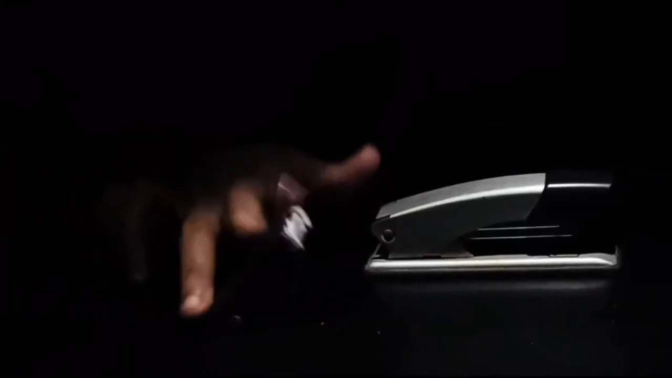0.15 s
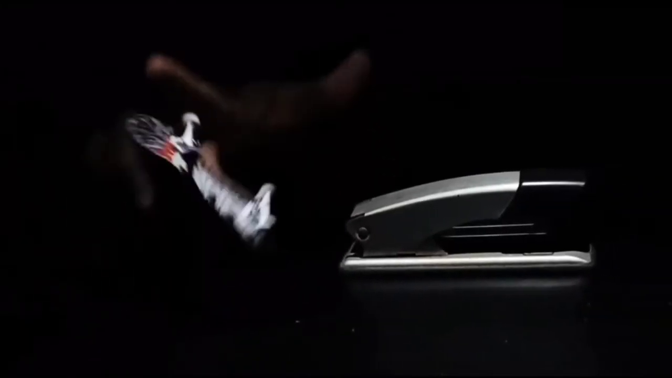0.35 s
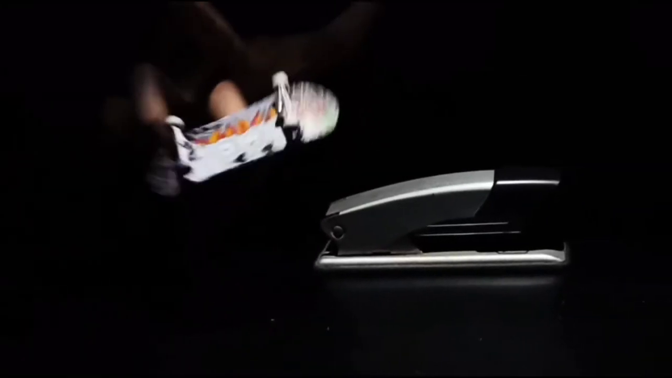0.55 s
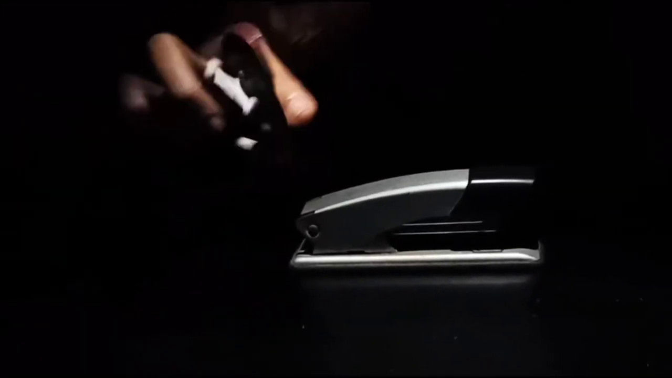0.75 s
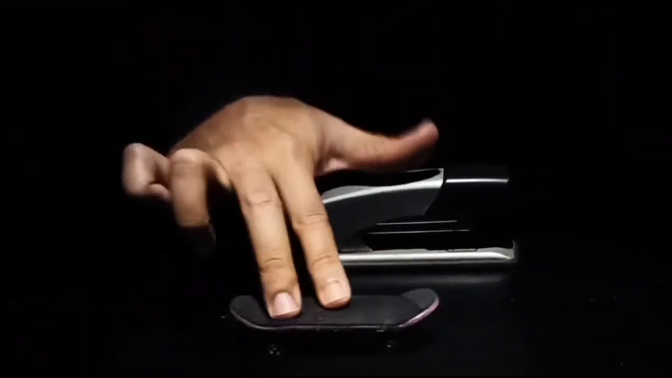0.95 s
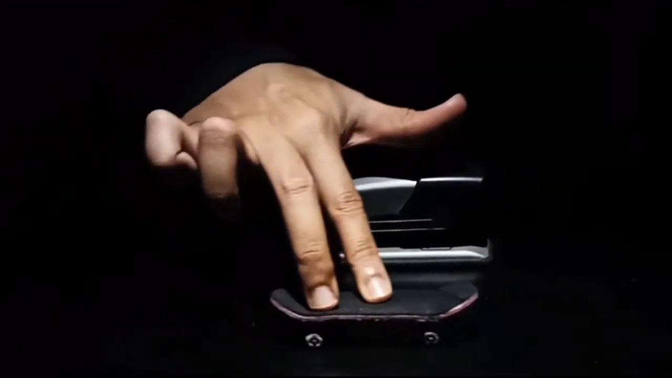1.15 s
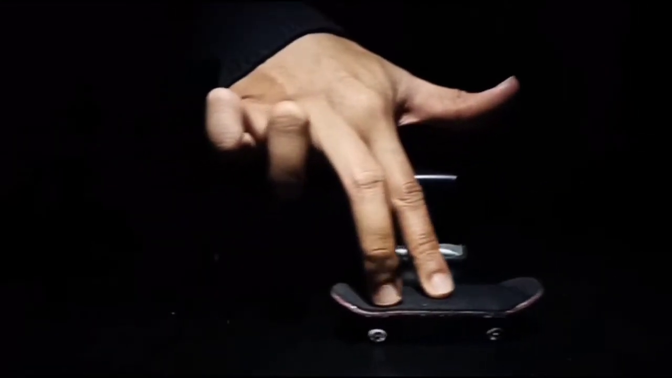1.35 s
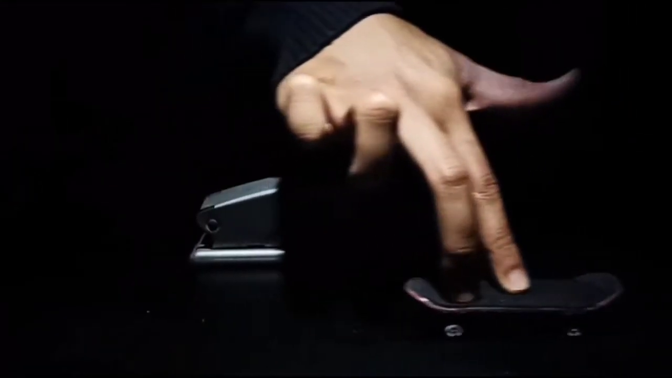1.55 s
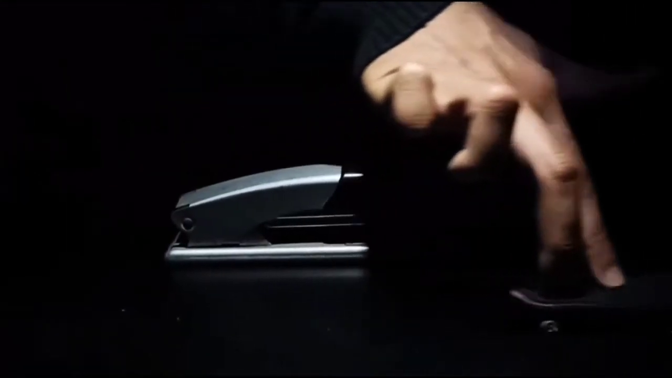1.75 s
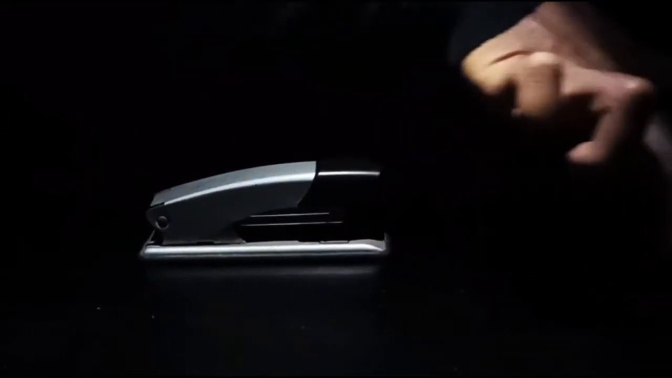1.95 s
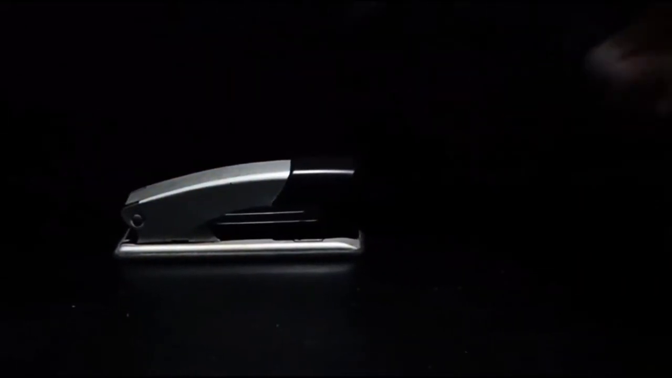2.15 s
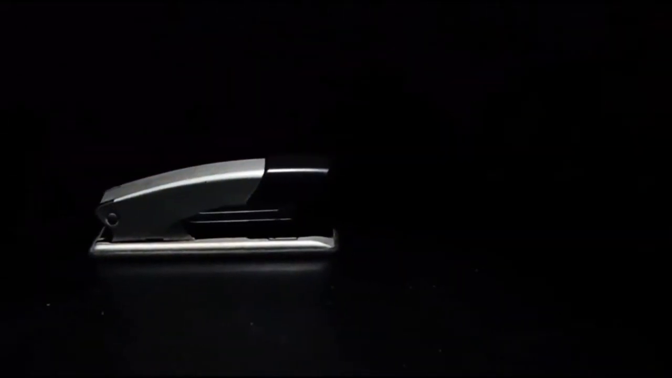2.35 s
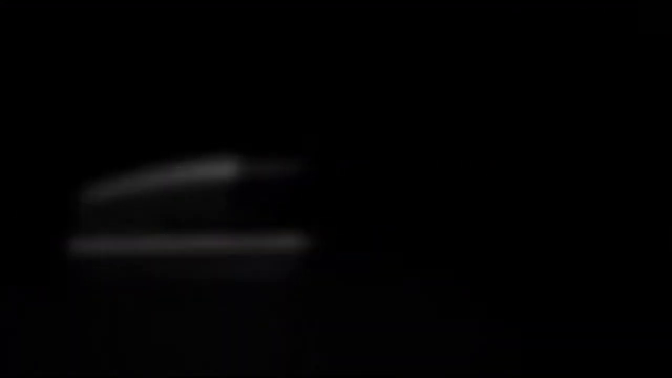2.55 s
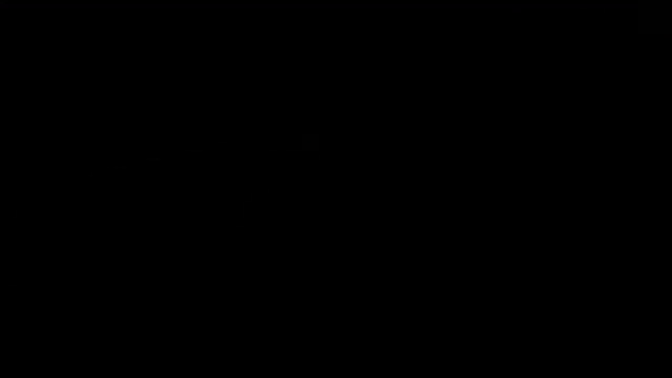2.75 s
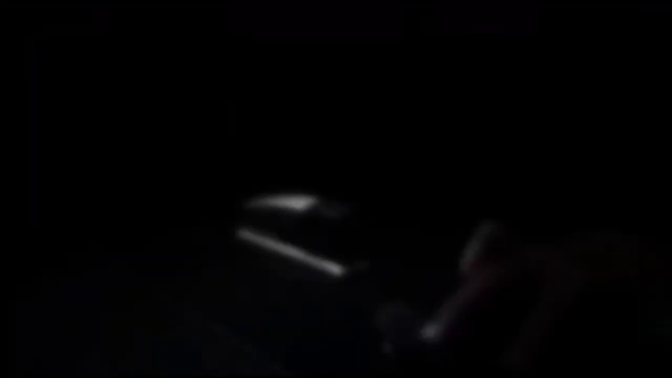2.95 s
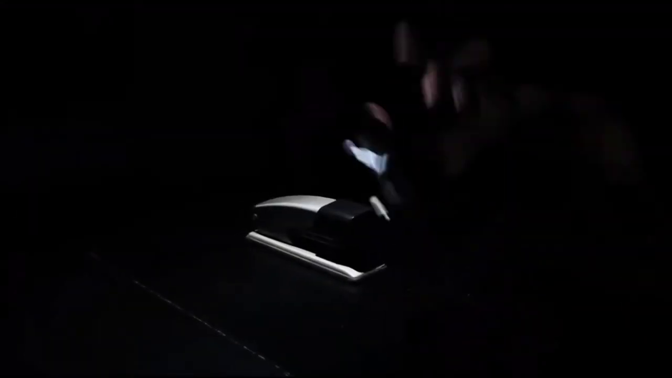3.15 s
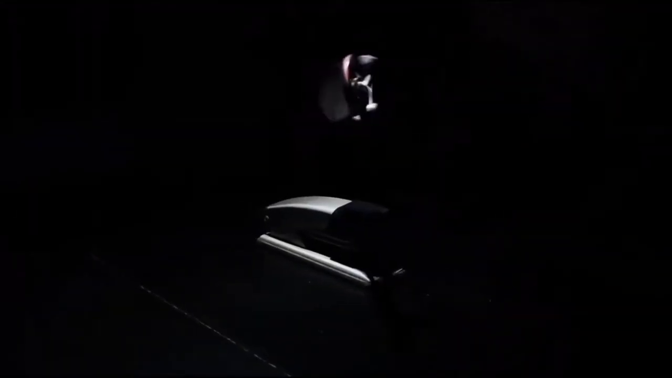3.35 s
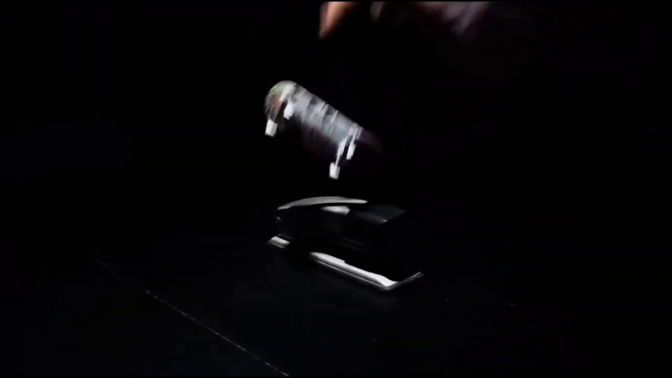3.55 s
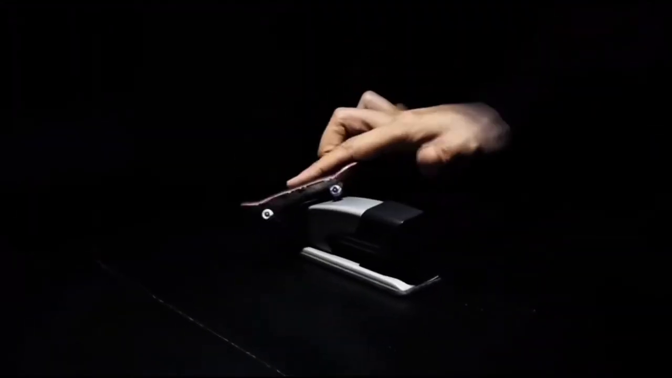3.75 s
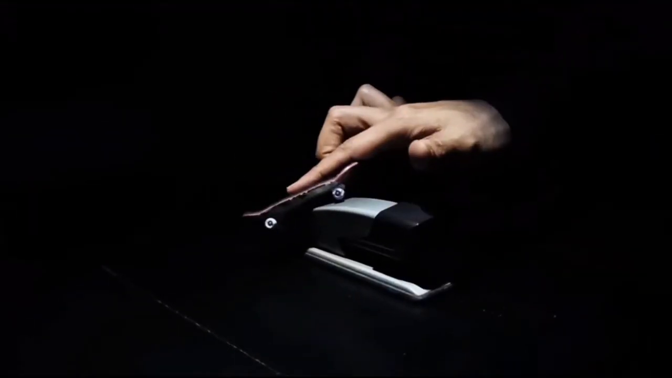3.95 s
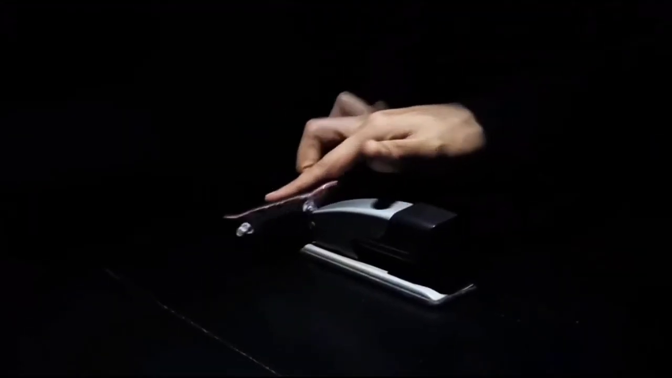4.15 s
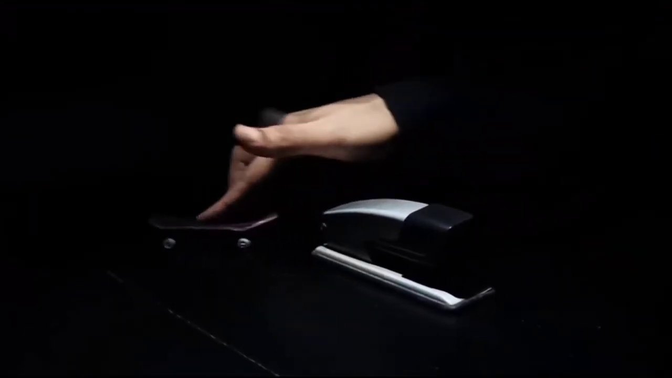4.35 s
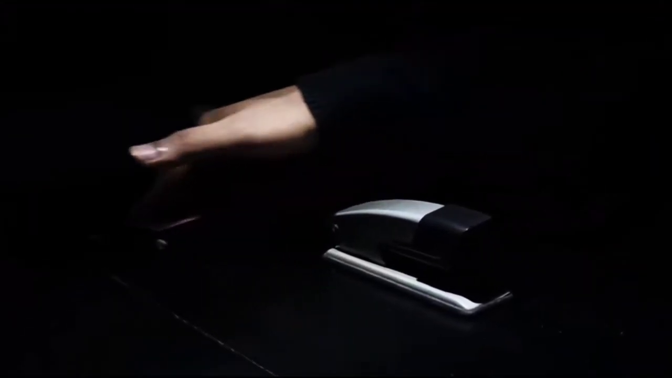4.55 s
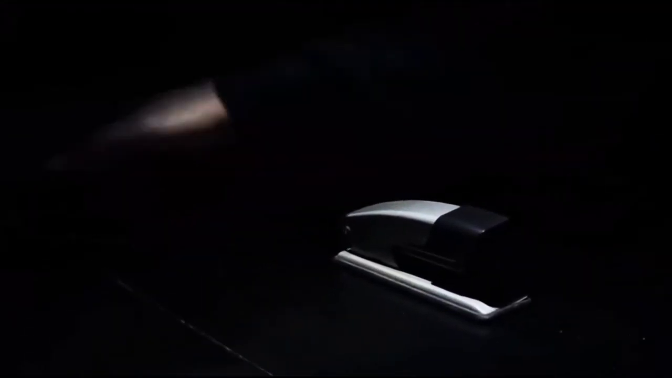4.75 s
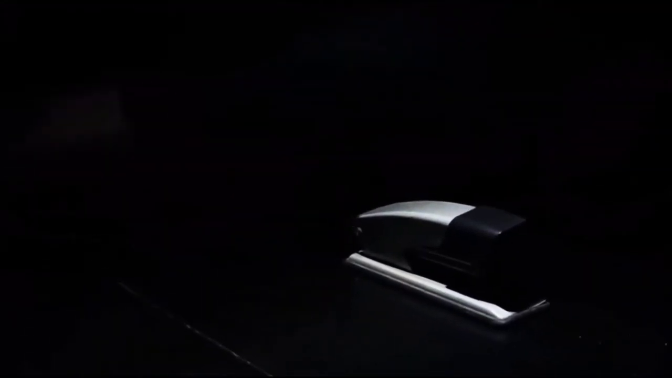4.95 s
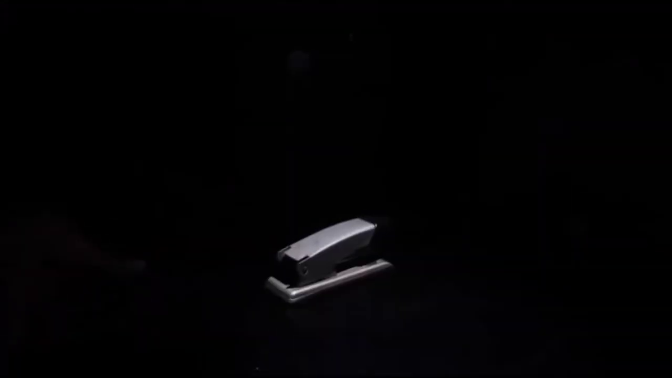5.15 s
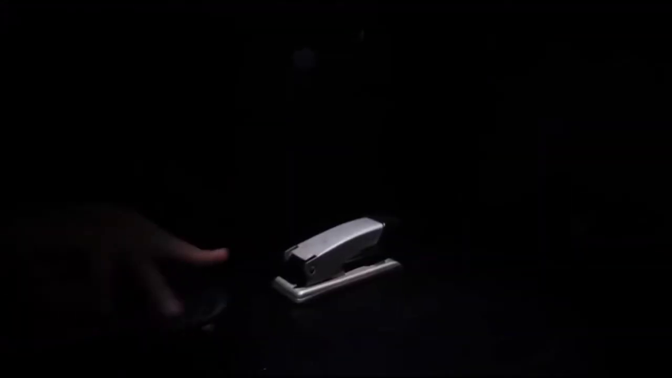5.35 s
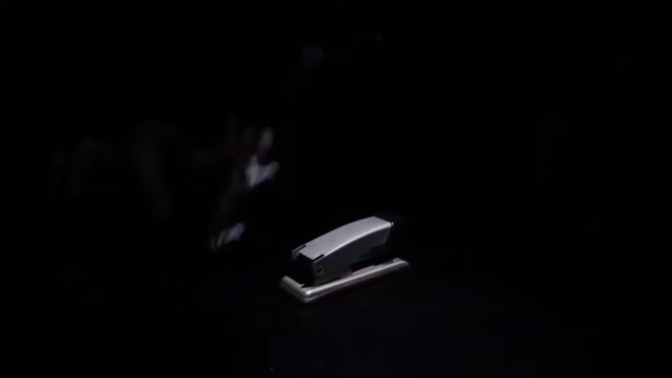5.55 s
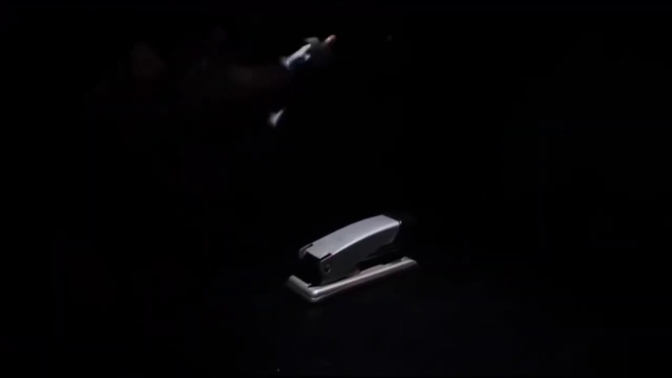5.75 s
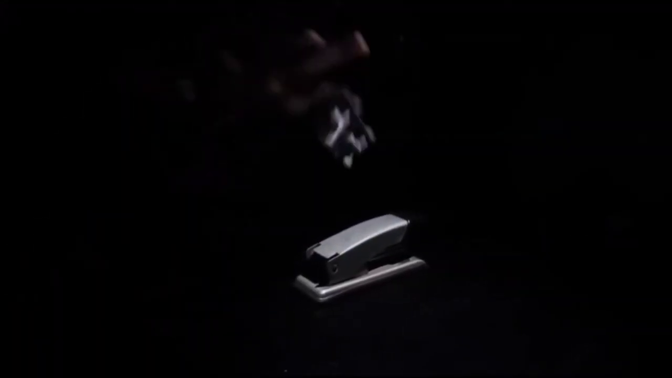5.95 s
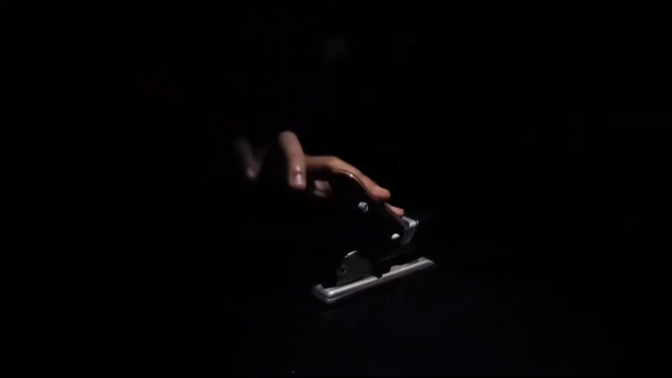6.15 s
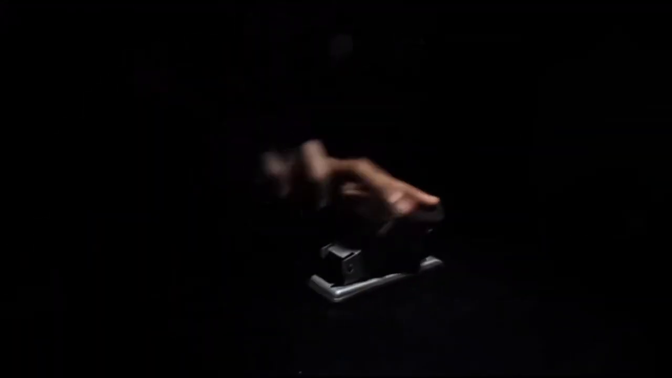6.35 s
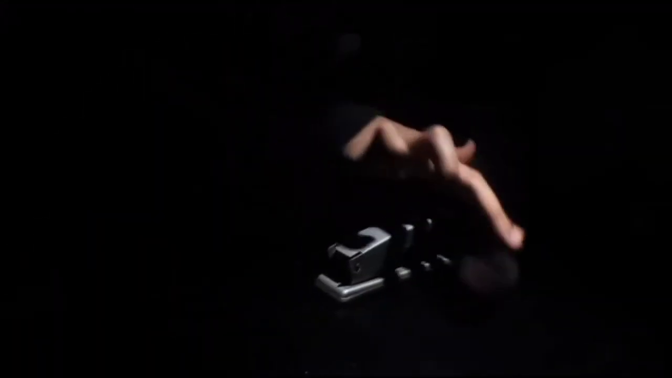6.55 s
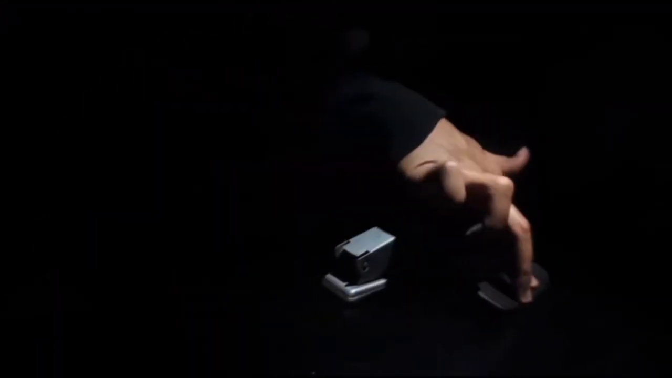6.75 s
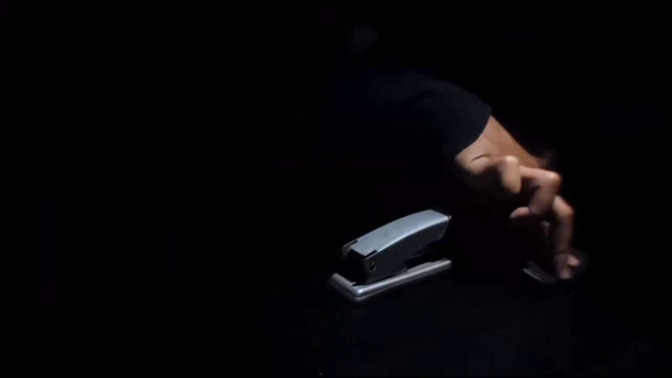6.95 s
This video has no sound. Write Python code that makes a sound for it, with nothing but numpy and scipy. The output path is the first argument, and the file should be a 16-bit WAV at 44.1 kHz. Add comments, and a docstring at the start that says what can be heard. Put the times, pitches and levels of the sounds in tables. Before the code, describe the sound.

Small wheels roll grittily and speed up before a dry tail crack; near silence, then a heavy double clack and fading roll. Again a roll and pop, a gap, a bright steel clack with rough metallic swell, gritty scrapes and table clacks. Finally hoarse wheel skids, a pop, another steel hit, a brief ping and a landing. Close, dry, slightly reverberant indoor stereo sound with faint air.

```python
"""Small hard wheels rumble over a table top, then a tail snaps down with a dry crack: a fingerboard does three
tricks, over a steel stapler too, in a small hard room. Rolling, skids, drags and rough metallic swells are
noise through resonances; pops, landings and taps are bursts of clicks that ring the struck body.
The level drops at the start and four more times, three of them between a pop and its landing.
A limiter holds down the loudest clacks."""
import sys
import numpy as np
from scipy import signal
from scipy.fft import rfft, irfft, next_fast_len
from scipy.io import wavfile
from scipy.ndimage import uniform_filter1d, minimum_filter1d, map_coordinates

SR = 44100
rng = np.random.default_rng(int(sys.argv[2]) if len(sys.argv) > 2 else 0)


def master_out(mix):
    """Clip the mix to full scale and print it as 16-bit PCM to the path in sys.argv[1]."""
    frames = np.transpose(np.atleast_2d(mix))
    ceiling = np.clip(frames, -1, 1)
    pcm = np.round(ceiling * 32767).astype(np.int16)
    wavfile.write(sys.argv[1], SR, pcm)


N = 308744
TIME = np.arange(N) / SR
ONSET_S = 0.008  # a clack has this much room for its soft onset ahead of its peak
THUMP_LEAD_S = 0.008  # the fingers' weight reaches the table just before the wheels clack

# Well damped resonances of deck, trucks and wheels.
# Each row: frequency in Hz, width in Hz, level in dB.
BOARD_MODES = [(1996, 870, -4.5), (3110, 220, 5.5), (3660, 330, 7.5), (4280, 460, 7), (6255, 310, 1.5),
               (7360, 300, -1.5), (8340, 150, -11)]
# Resonances of the stapler's steel cover.
# Each row: frequency in Hz, width in Hz, level in dB.
STAPLER_MODES = [(1650, 520, -1), (3880, 120, 3.5), (4160, 220, 9), (4523, 200, 7.5), (5750, 200, 0.5),
                 (6210, 530, 0.5), (6860, 86, 4), (7360, 190, -2.5), (7900, 130, -3)]
RINGS_WITH = {"table": BOARD_MODES, "stapler": STAPLER_MODES}
# Spectrum of grit under the wheels. Each row: frequency in Hz, level in dB.
GRIT_SPECTRUM = [(300, -39), (1200, -1), (2300, 0), (3300, 1.5), (4500, 1.5), (5500, -5.5), (6400, -0.5),
                 (8500, -11), (12500, -16.5), (16000, -15)]
# The tail snapping on the table; the note depends on where the fingers hold the deck.
# Each row: time in seconds, strength in dB, deck note in Hz, note level in dB, note t60 in seconds.
POP_ROWS = [(0.4417, 1, 272, -24, 0.12), (3.3844, -1.5, 475, -30, 0.29), (5.864, -0.5, 402, -32, 0.16)]


def amp(db):
    """Decibels to gain."""
    return 10 ** (np.asarray(db) / 20)


def unit(x):
    """Scale to rms 1."""
    return x / np.sqrt(np.mean(x ** 2) + 1e-20)


def along(points, hz):
    """(Hz, value) points read on a log frequency axis."""
    f, v = np.transpose(points)
    return np.interp(np.log(hz + 1), np.log(f + 1), v)


def filtered(x, response):
    """x times a response of frequency."""
    size = x.shape[-1]
    m = next_fast_len(size + 8192)
    return irfft(rfft(x, m) * response(np.fft.rfftfreq(m, 1 / SR)), m)[..., :size]


def coloured(x, spectrum):
    """x shaped by (Hz, dB) points."""
    return filtered(x, lambda hz: amp(along(spectrum, hz)))


def resonant(x, modes, direct_db):
    """x through (Hz, width, dB) resonances, over a direct path."""
    def response(f):
        peaks = sum(amp(db) * 1j * f * w / (c * c - f * f + 1j * f * w) for c, w, db in modes)
        return amp(direct_db) + peaks
    return filtered(x, response)


def wobble(rate):
    """A smooth random curve, rate knots a second."""
    return map_coordinates(rng.standard_normal(8192), [TIME * rate], mode="wrap")


def panned(lr_db):
    """Left and right gains of equal total power; positive leans left."""
    g = amp(np.array([np.atleast_1d(lr_db), -np.atleast_1d(lr_db)]) / 2)
    return g / np.sqrt(np.mean(g ** 2, axis=0))


def add(track, s, sound):
    """Mix a sound into a track at time s."""
    part = track[:, round(s * SR):][:, :sound.shape[-1]]
    part += sound[..., :part.shape[-1]]


def arrival(x):
    """Direct sound reaches the left port a little later than the right, which is nearer the board."""
    port_lag = 0.0003307  # s
    return filtered(x, lambda hz: np.exp(-1j * np.pi * hz * port_lag * np.array([[1], [-1]])))


def room(x, build=0.0077):
    """Reflections thicken over the first moments, then each frequency dies at its own speed."""
    # How long the room rings. Each row: frequency in Hz, t60 in seconds.
    room_t60 = [(100, 0.72), (500, .5), (2000, 0.186), (5000, 0.45), (9000, 0.2963), (15000, 0.39)]
    # How bright its reflections are. Each row: frequency in Hz, level in dB.
    room_colour = [(100, 0.5), (400, -5.5), (1000, 1), (2500, 6), (4100, 2.5), (5400, -2.5), (7000, 3),
                   (9000, 2), (13000, -2)]
    hz, t, z = signal.stft(rng.standard_normal((2, SR // 2)), SR, nperseg=256)
    fade = amp(along(room_colour, hz)[:, None] - 60 * t / along(room_t60, hz)[:, None])
    tail = signal.istft(z * fade * (1 - np.exp(-t / build)), SR, nperseg=256)[1]
    return signal.fftconvolve(x, tail / np.linalg.norm(tail[0]), axes=1)


def asperities(rate, spread_db):
    """Stereo train of tiny impacts of uneven size, alike at both ports mainly in the bass."""
    # Each row: frequency in Hz, left-right likeness (1 = identical).
    likeness = [(100, 1), (300, 0.27), (900, 0.36), (2000, 0.049), (8000, 0.28)]

    def mid_side(hz):
        turn = np.arccos(np.clip(along(likeness, hz), -1, 1)) / 2
        return np.array([np.cos(turn), np.sin(turn)])
    size = amp(spread_db * wobble(rate))
    mid, side = filtered(size * rng.standard_normal((2, N)), mid_side)
    return np.array([mid + side, mid - side])


def gritty(size, rate, spread_db):
    """A short stereo burst of tiny impacts of uneven size, partly shared by both ports."""
    knots = rng.standard_normal(8192)
    sizes = amp(spread_db * np.interp(np.arange(size) * rate / SR, np.arange(len(knots)), knots))
    noise = rng.standard_normal((3, size))
    return unit(arrival(sizes * (noise[:2] + amp(-7.5) * noise[2])))


def ring(modes, t, scatter_db, detune, phase_spread):
    """Damped modes at new strengths for each blow, reaching each port at its own phase."""
    hz, db, t60 = np.transpose(modes)[:, :, None]
    level, pitch, phase = rng.standard_normal((3, len(modes), 1))
    size = amp(db + scatter_db * level)
    fade = size / np.linalg.norm(size) * amp(-60 * t / t60)
    angle = 2 * np.pi * hz * (1 + detune * pitch) * t
    ports = [np.sum(fade * np.sin(angle + side * phase_spread * phase), axis=0) for side in (1, -1)]
    return np.array(ports)


def swells(rows, rise_db_per_s, fade_db_per_s):
    """Gain that starts, climbs to its peak, fades steadily in dB and stops after its length."""
    total = 0
    for start, rise, length, db in rows:
        t = TIME - start
        sounding = uniform_filter1d(1.0 * ((t >= 0) & (t <= length)), size=180)
        drop_db = np.maximum(rise_db_per_s * (rise - t), fade_db_per_s * (t - rise))
        total = total + sounding * amp(db - drop_db)
    return total


def gliding(x, octaves_per_s):
    """Every resonance in x slides in pitch as the contact point moves."""
    index = np.arange(x.shape[1])
    position = np.cumsum(2 ** (octaves_per_s * index / SR))
    return np.array([np.interp(position, index, channel, right=0) for channel in x])


def gate(length, attack, release):
    """One second of gain that rises, holds and has fallen again after length."""
    t = np.arange(SR) / SR
    return np.clip(np.minimum(t / attack, (length - t) / release), 0, 1)


def air():
    """The faint air of the room is steady coloured noise."""
    # Each row: frequency in Hz, level in dB.
    air_spectrum = [(30, -29.5), (143, -6.5), (1000, -20.5), (6360, -23), (11000, -31), (12200, -29.5),
                    (15000, -26)]
    return amp(-51.0) * unit(coloured(rng.standard_normal((2, N)), air_spectrum))


def strokes():
    """Rumble gain, grit gain and pitch: each stroke gets going, speeds up or coasts, and dies away."""
    # Strokes of the wheels over the table. Each row: start, rise, hold and release in seconds,
    # rumble in dB, change over the hold in dB, grit over rumble in dB, top pitch in Hz.
    stroke_rows = [(0.155, 0.003, 0.2, 0.1, -26, 6, -7, 1024), (1.18, 0.22, 0.64, 0.42, -33, -6.5, -3, 960),
                   (2.042, 0.03, 0.023, 0.19, -39, 1, -18, 880),
                   (2.598, 0.06, 0.16, 0.047, -31.5, -3.5, -6, 870),
                   (2.91, 0.1, 0.27, 0.066, -25.5, 8, -5.5, 1110),
                   (4.308, 0.12, 0.011, 0.027, -29, 3, 4, 910),
                   (4.512, 0.023, 0.017, 0.13, -37.5, 6, 4, 830),
                   (4.547, 0.3, 0.31, 0.094, -25.5, -15, -8, 1110),
                   (5.303, 0.056, 0.076, 0.059, -26, 1.5, -6, 1030),
                   (5.539, 0.098, 0.15, 0.041, -27, 8.5, -8, 1270),
                   (6.78, 0.052, 0.13, 0.081, -32, -1.5, -5.5, 1110)]
    depth_db = 21  # what a stroke gains in its rise and loses over one release time
    sag_hz_per_db = 18.5  # the drumming sinks as the wheels slow down
    rumble, grit, pitch = [], [], []
    for start, rise, hold, release, db, change_db, grit_db, top_hz in stroke_rows:
        t = TIME - start
        edges = np.maximum(1 - t / rise, 0) + np.maximum(t - rise - hold, 0) / release
        effort_db = change_db * np.clip((t - rise) / hold, 0, 1) - depth_db * edges
        rumble.append(amp(db + effort_db))
        grit.append(amp(db + effort_db + grit_db))
        pitch.append(top_hz + sag_hz_per_db * (effort_db - max(change_db, 0)))
    # extra grit as the fingers load the tail before a pop
    press_db, press_lead_s, press_width_s = 9, 0.083, 0.064
    press = sum(np.exp(-((TIME - s + press_lead_s) / press_width_s) ** 2) for s, *_ in POP_ROWS)
    grit_gain = np.linalg.norm(grit, axis=0) * amp(press_db * press)
    # the loudest stroke sets the pitch, which wanders with the grain under the wheels
    pitch_hz = np.average(pitch, axis=0, weights=np.square(rumble) + 1e-20) + 44.4 * wobble(8.8)
    return np.linalg.norm(rumble, axis=0), grit_gain, pitch_hz


def focused(x, pitch_hz, boost_db=7, width_octaves=0.46):
    """x with its energy drawn towards a moving pitch, at unchanged power."""
    hz, t, z = signal.stft(x, SR, nperseg=1024)
    away = np.log2((hz[:, None] + 1) / np.interp(t, TIME, np.maximum(pitch_hz, 1)))
    gain = amp(boost_db * np.exp(-(away / width_octaves) ** 2))
    power = np.average(gain ** 2, axis=0, weights=np.mean(np.abs(z) ** 2, axis=(0, 2)))
    return signal.istft(z * gain / np.sqrt(power))[1][:, :N]


def specks(rate=130, spread_db=5):
    """The wheels crush scattered specks of dust, rate of them a second on average."""
    sizes = amp(spread_db * np.minimum(rng.standard_normal(N), 2))
    hits = (rng.random(N) < rate / SR) * sizes
    return unit(coloured(hits, GRIT_SPECTRUM))


def drifting_echo(x, delay=0.001098, swing=0.00039, echo_db=-10):
    """A nearby surface returns a copy whose delay changes as the board moves, so the colour drifts."""
    position = np.arange(N) - SR * (delay + swing * wobble(1.66))
    return x + amp(echo_db) * np.array([map_coordinates(channel, [position]) for channel in x])


def wheels():
    """Hard wheels drum on the table's grain; with speed the drumming reaches higher modes and grit crackles."""
    # Spectrum of the drumming. Each row: frequency in Hz, level in dB.
    rumble_spectrum = [(35, -64.5), (60, -35), (86, -24), (187, -20.5), (240, -12.5), (529, -5), (948, -6),
                       (1200, -6.5), (1650, -10), (2600, -21.5), (5720, -120)]
    # Resonances of the table top under the wheels. Each row: frequency in Hz, width in Hz, level in dB.
    top_modes = [(614, 120, -13), (792, 120, -1), (967, 26, 2), (1041, 22, -1.5), (1190, 69, -5),
                 (1303, 33, 7), (1800, 48, -9.5)]
    rumble_gain, grit_gain, pitch_hz = strokes()
    drum = coloured(asperities(rate=700, spread_db=3.2), rumble_spectrum)
    rumble = focused(unit(resonant(drum, top_modes, direct_db=-0.5)), pitch_hz)
    grit = unit(coloured(asperities(rate=1100, spread_db=2.4), GRIT_SPECTRUM))
    crackle = grit + amp(-16) * specks()
    bumps = amp(0.6 * wobble(130) + 0.7 * wobble(25))
    rolling = bumps * (rumble_gain * rumble + grit_gain * crackle)
    roll = drifting_echo(rolling) * panned(-6.0)
    return arrival(roll) + amp(-17.5) * room(roll)[:, :N]


def clack(db, knock_db, lr_db, room_db, body, ring_db, hold, crack_t60, rise):
    """A burst of clicks, with a short soft onset and a sharp snap at its peak, rings the body and its support."""
    # Spectrum of the clicks. Each row: frequency in Hz, level in dB.
    crack_spectrum = [(100, -9), (500, 2), (1000, -3.5), (2200, -1), (4300, -1), (5400, 4), (12000, 4.5),
                      (16000, -2.5)]
    # The hollow knock of the deck against its support. Each row: frequency in Hz, level in dB, t60 in seconds.
    knock_modes = [(287.3, -0.5, 0.053), (362.7, 2, 0.054), (475, -9, 0.05), (684, -0.5, 0.04),
                   (914, -3.5, 0.036)]
    t = np.arange(SR // 8) / SR - ONSET_S
    after = np.maximum(t, 0)
    stretch = amp(db / 2)  # onset and hold are longer when louder
    onset = np.exp(np.minimum(t, 0) / (rise * stretch))
    burst = onset * amp(-60 * np.maximum(t - hold * stretch, 0) / crack_t60)
    burst = burst * (1 + amp(-8.0) * np.exp(-(t / 0.0008) ** 2))  # the sharp snap at the peak
    grains = gritty(size=len(t), rate=2200, spread_db=3.0)
    clicks = unit(grains * burst) * np.sqrt(np.mean(burst ** 2))
    modes = []
    for hz, width, level in body:  # each spot favours other modes
        spot_hz = hz * (1 + 0.0028 * rng.standard_normal())
        modes.append((spot_hz, width, level + ring_db + 2 * rng.standard_normal()))
    crack = unit(resonant(coloured(clicks, crack_spectrum), modes, direct_db=-0.5)) * np.std(clicks)
    knock = ring(knock_modes, after, scatter_db=3, detune=0.04, phase_spread=0.5)
    knock = knock * (1 - np.exp(-after / 0.00044))
    hit = amp(db) * (amp(-4) * crack + amp(knock_db) * knock)
    out = amp(room_db) * room(hit)
    add(out, 0, hit * panned(lr_db))
    return out


def thump(db):
    """A soft, heavy blow reaches only the table's lowest modes."""
    # The table's low modes. Each row: frequency in Hz, level in dB, t60 in seconds.
    table_modes = [(81, 0, 0.012), (101, -1, 0.1), (128, 4.5, 0.094), (160, -8.5, 0.2), (232, -7, 0.017)]
    t = np.arange(SR // 3) / SR
    u = t / 0.0035
    push = (1 - u) * np.exp(-u) * panned(-13.5)
    low_ring = ring(table_modes, t, scatter_db=2, detune=0.028, phase_spread=0.55)
    onset = 1 - np.exp(-t / 0.007)
    boom = amp(db) * (amp(11.0) * low_ring + amp(-11) * push) * onset
    out = amp(-13) * room(boom)
    add(out, 0, boom * panned(-8.5))
    return out


def pops():
    """The wooden tail snaps on the table: a short, dry crack, and the lifted deck buzzes on one note."""
    knock_db, thump_db = -23, -33.5  # relative to the strength of the pop
    out = np.zeros((2, N))
    t = np.arange(SR // 3) / SR
    for s, db, note_hz, note_db, note_t60 in POP_ROWS:
        crack = clack(db, knock_db, lr_db=6, room_db=-10.5, body=BOARD_MODES, ring_db=-8,
                      hold=0.0008, crack_t60=0.013, rise=0.0016)
        add(out, s - ONSET_S, crack)
        buzz = gritty(size=SR, rate=90, spread_db=3)
        note = unit(resonant(buzz, [(note_hz, 45, 0)], direct_db=-40))[:, :len(t)]
        add(out, s, amp(note_db - 60 * t / note_t60) * note * (1 - np.exp(-t / 0.0022)))
        add(out, s - THUMP_LEAD_S, thump(db + thump_db))
    return out


def taps():
    """Lone contacts of wheels and trucks as the board shifts, and the soft pushes of the fingers."""
    # Single knocks of wheels and trucks. Each row: time in seconds, strength in dB, left over right in dB,
    # room in dB, knock relative to the strength in dB, what is struck.
    tap_rows = [(0.4455, -7.5, 3.5, -7.5, -18.5, "table"), (1.070, -21, 1, 4, -31, "table"),
                (1.0751, -14, -5, 4, -35, "table"), (1.2186, -26.5, -12.5, -23, -10, "table"),
                (2.307, -27.5, -4.5, -1, -35, "table"), (4.177, -35.5, 0, 5, -2.5, "stapler"),
                (4.333, -25, -7, -13, -12, "table"), (4.3425, -14.5, -16.5, -8, -18, "table"),
                (4.411, -8.5, -12, -4.5, -31, "table"), (4.4598, -8, -10, -18.5, -29, "table"),
                (5.3327, -16, -30, -3.5, 10, "table"), (6.408, -27, -7, -14, -38, "stapler"),
                (6.5794, -2, -7, -16.5, -21, "stapler"), (6.791, -7.5, -3, -3, -46, "table"),
                (6.798, -21, 1, -6, -7, "table")]
    # Fingers leaning on the board shake the table. Each row: time in seconds, strength in dB.
    push_rows = [(2.923, -35), (3.927, -42.5), (4.183, -37), (4.345, -30.5), (6.382, -39), (6.529, -23)]
    out = np.zeros((2, N))
    for s, db, lr_db, room_db, knock_db, struck in tap_rows:
        tap = clack(db, knock_db, lr_db, room_db, RINGS_WITH[struck], ring_db=6,
                    hold=0.0016, crack_t60=0.022, rise=0.0007)
        add(out, s - ONSET_S, tap)
    for s, db in push_rows:
        add(out, s, thump(db))
    return out


def landings():
    """The fingers drive the board down: the table thumps and the two axles clack in turn."""
    # Each row: time in seconds, strength in dB, second axle later by seconds, second axle strength in dB,
    # knock relative to the strength in dB, thump in dB, what is struck.
    landing_rows = [(1.043, -0.5, 0.0037, -1.5, -15, -21.5, "table"),
                    (2.5886, -19, .0437, -12.5, -41, -66, "table"),
                    (3.858, 2, .0158, -0.5, -21, -27.5, "stapler"),
                    (4.474, 1, .0172, -2.5, -17, -22, "table"),
                    (5.291, -6.5, .0186, -10.5, -30, -47.5, "table"),
                    (6.2005, 0.5, 0.0113, -9, -18.5, -25, "stapler"),
                    (6.769, -2, .015, -2.5, -8, -21.5, "table")]
    out = np.zeros((2, N))
    for s, first_db, gap, second_db, knock_db, thump_db, struck in landing_rows:
        add(out, s - THUMP_LEAD_S, thump(thump_db))
        for at, db in (s, first_db), (s + gap, second_db):
            axle = clack(db, knock_db, lr_db=-8.5, room_db=-9.5, body=RINGS_WITH[struck], ring_db=0,
                         hold=0.003, crack_t60=0.014, rise=0.0017)
            add(out, at - ONSET_S, axle)
    return out


def coasting(room_db=-14):
    """The rolling wheels shake the deck in uneven streaks; its hum climbs as the board travels."""
    # Long coasts, in which the deck hums along. Each row: start in seconds, length in seconds, level in dB.
    coast_rows = [(1.312, 0.85, -35.5)]
    # Deck resonances at the start of a coast. Each row: frequency in Hz, width in Hz, level in dB.
    hum_modes = [(386, 22, 9), (850, 73, 3.5), (1240, 81, 13), (1420, 89, -4), (4250, 560, -2.5)]
    out = np.zeros((2, N))
    for start, length, db in coast_rows:
        hum = unit(resonant(gritty(size=SR, rate=200, spread_db=4.0), hum_modes, direct_db=-45))
        climbing = gliding(hum, octaves_per_s=0.55)
        add(out, start, amp(db) * climbing * gate(length, attack=0.062, release=0.45))
    out = out * amp(1.5 * wobble(70)) * panned(-18)
    return out + amp(room_db) * room(out)[:, :N]


def metallic_swells(flicker_db=1.2, room_db=-13, low_db=-17):
    """Rough metallic noise swells just after a clack and dies away, over a low rumbling part."""
    # Each row: start, rise and length in seconds, level in dB.
    swell_rows = [(3.885, 0.051, 0.38, -20), (4.176, 0.0043, 0.18, -33), (6.226, 0.033, 0.19, -23.5),
                  (6.534, 0.012, 0.041, -22)]
    # Spectrum of the metallic noise. Each row: frequency in Hz, level in dB.
    metallic_spectrum = [(200, -46), (900, 2), (2400, 10), (4300, 6.5), (5500, 10), (7200, 7.5),
                         (9000, 9.5), (16000, 5.5)]
    # Spectrum of the low rumbling part. Each row: frequency in Hz, level in dB.
    low_spectrum = [(45, -32), (90, 6), (145, 8), (320, -10.5), (1500, -66)]
    rough = asperities(rate=450, spread_db=4.2)
    ringing = unit(resonant(coloured(rough, metallic_spectrum), STAPLER_MODES, direct_db=-0.5))
    metallic = ringing * amp(flicker_db * wobble(150))
    low = amp(low_db) * unit(coloured(rough, low_spectrum)) * panned(1.5)
    both = metallic * swells(swell_rows, rise_db_per_s=176.0, fade_db_per_s=194.0)
    both = both + low * swells(swell_rows, rise_db_per_s=55, fade_db_per_s=118.0)
    return arrival(both) + amp(room_db) * room(both)[:, :N]


def drags(room_db=-12):
    """The tail scrapes the table in short gritty strokes, each with a sinking resonance."""
    # The tail dragging over the table as the board leaves the stapler.
    # Each row: start in seconds, length in seconds, level in dB, resonance at the start in Hz.
    drag_rows = [(4.274, 0.14, -34.5, 2440), (4.359, 0.086, -21, 2150), (4.398, 0.057, -17.5, 1500),
                 (4.447, 0.04, -15.5, 2400)]
    # Spectrum of the scrape. Each row: frequency in Hz, level in dB.
    drag_spectrum = [(100, -7), (500, 0.5), (4300, 1.5), (7200, 2.5), (15000, -1.5)]
    out = np.zeros((2, N))
    for start, length, db, hz in drag_rows:
        grains = coloured(gritty(size=SR, rate=650, spread_db=2.5), drag_spectrum)
        modes = [(hz, 300, 6), (4400, 350, 2), (7300, 600, 1)]  # Hz, width Hz, dB
        rasp = gliding(unit(resonant(grains, modes, direct_db=1.0)), octaves_per_s=-1.6)
        add(out, start, amp(db) * rasp * gate(length, attack=0.0088, release=0.02))
    return out * panned(-15) + amp(room_db) * room(out)[:, :N]


def skids():
    """Wheels pressed sideways stick and slip in a hoarse rasp."""
    # Wheels skidding sideways. Each row: start, rise and length in seconds, level in dB.
    skid_rows = [(5.328, 0.015, 0.087, -17), (5.593, 0.0029, 0.034, -30.5), (5.69, 0.063, 0.16, -18.5)]
    # Resonances of a skidding wheel. Each row: frequency in Hz, width in Hz, level in dB.
    skid_modes = [(1850, 86, 3), (2384, 220, 11), (3040, 510, 6)]
    rasp = resonant(asperities(rate=2300, spread_db=1.0), skid_modes, direct_db=-34.0)
    pressure = swells(skid_rows, rise_db_per_s=160, fade_db_per_s=216.5)
    return pressure * arrival(unit(rasp)) * panned(-7.0)


def pings(room_db=-9):
    """Once the truck is off it, the steel cover rings briefly on the mode that was flicked."""
    # Each row: time in seconds, level in dB, frequency in Hz, t60 in seconds.
    ping_rows = [(6.409, -42, 3700, 0.13), (6.5815, -16, 4237, 0.036)]
    out = np.zeros((2, N))
    t = np.arange(SR // 4) / SR
    for s, db, hz, t60 in ping_rows:
        note = amp(db) * ring([(hz, 0, t60)], t, scatter_db=0, detune=0, phase_spread=0.5)
        add(out, s, note)
        add(out, s, amp(room_db) * room(note))
    return out


def scene():
    """The board's sounds over the faint air of the room."""
    rolling = wheels() + coasting()
    rough = metallic_swells() + drags() + skids()
    striking = pops() + taps() + landings() + pings()
    return air() + rolling + rough + striking


def record(dry):
    """Overall treble colour, muted stretches, a fast limiter and the band limit."""
    # Overall treble colour, with a deep dip around 11 kHz. Each row: frequency in Hz, level in dB.
    treble_colour = [(4600, 1), (5050, -4.5), (5900, -4), (6250, -1), (8400, -1), (9000, -7.5),
                     (10600, -22.5), (11300, -27), (11800, -1.5), (15500, -4)]
    # Muted stretches. Each row: start in seconds, end in seconds, depth in dB, fade down in seconds.
    mute_rows = [(0, 0.156, -13.5, 0.00079), (0.696, 1.025, -57, 0.007), (2.256, 2.576, -29.5, 0.15),
                 (3.544, 3.816, -52.5, 0.026), (6.036, 6.186, -46, 0.0041)]
    x = coloured(dry, treble_colour)
    mute_db = 0
    for start, end, db, fade in mute_rows:
        mute_db = mute_db + db * np.clip((TIME - start) / fade, 0, 1) * (TIME < end)
    x = x * uniform_filter1d(amp(mute_db), size=130)
    needed = np.minimum(1, 0.85 / (np.abs(x) + 1e-9))  # gain that keeps each sample under the ceiling
    x = x * uniform_filter1d(minimum_filter1d(needed, size=60), size=60)
    top_hz = 15700
    return filtered(x, lambda hz: 1 / np.sqrt(1 + (hz / top_hz) ** 200))


dry = scene()
out = record(dry)
master_out(out)
```